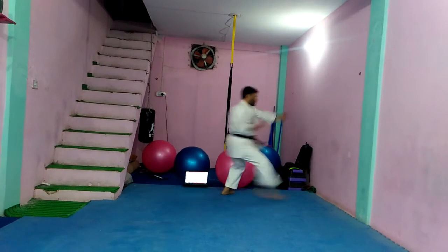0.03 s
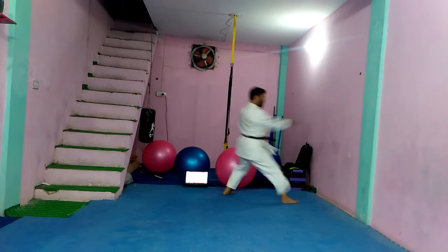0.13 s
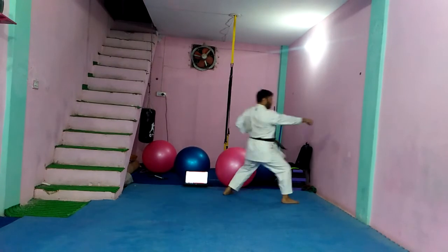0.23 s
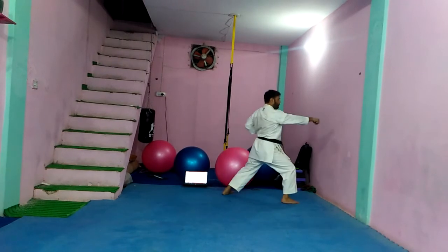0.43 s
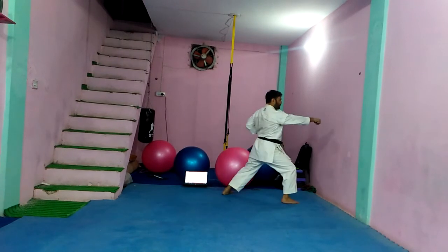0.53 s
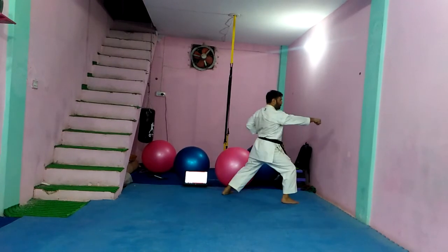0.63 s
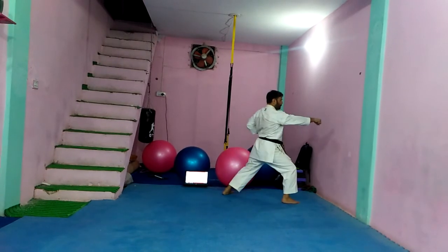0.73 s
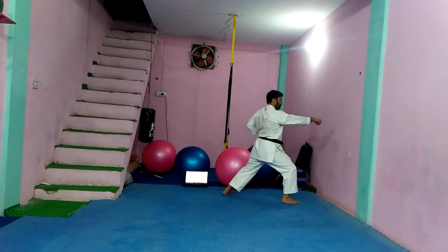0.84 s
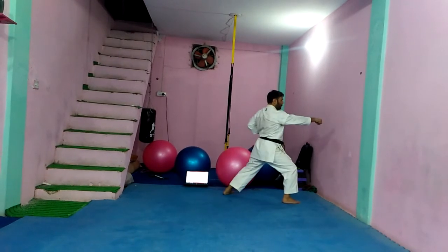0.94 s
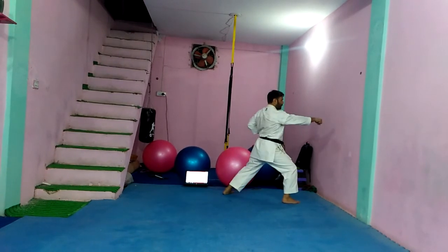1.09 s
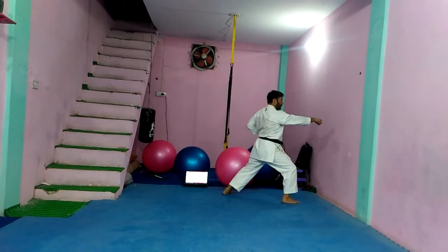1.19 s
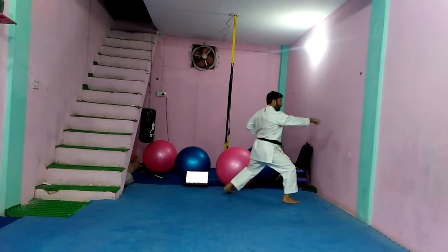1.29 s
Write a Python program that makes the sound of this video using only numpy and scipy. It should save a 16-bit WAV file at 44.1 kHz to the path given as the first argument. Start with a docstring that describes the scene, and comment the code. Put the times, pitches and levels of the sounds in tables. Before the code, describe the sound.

A single karate lunge makes a cloth snap and a foot thud. The cotton suit swishes softly from the start, with light scuffs on a foam mat. At about 0.3 seconds the fabric snaps taut as the bare foot lands with a slap and a dull thud. The small room rings briefly, and a low boom fades over the next second into a faint hush.

```python
"""A cotton karate suit swishes, then snaps taut with the punch of a single lunge.
It is heard from inside a small, bare-walled practice room, centred on a stereo microphone.
A bare foot slides out and thuds onto the foam mat. The walls ring briefly, and the room's
low standing waves boom on for a second. A noise suppressor lowers the faint hush."""
import sys
import numpy as np
from scipy import signal
from scipy.fft import rfft, irfft, next_fast_len
from scipy.io import wavfile
from scipy.ndimage import uniform_filter1d

SR = 44100
rng = np.random.default_rng(int(sys.argv[2]) if len(sys.argv) > 2 else 0)


def persist_wave(psi):
    """Save psi, clipped to +-1, as 16-bit WAV."""
    counts = np.round(np.clip(psi, -1, 1) * 32767).astype(np.int16)
    wavfile.write(sys.argv[1], SR, np.atleast_2d(counts).T)


N = 59535
LEAD = 16384  # samples before time zero, so that the room is already sounding


def amp(db):
    """Decibels to gain."""
    return 10 ** (np.asarray(db) / 20)


def clock():
    """Time in seconds, lead-in included."""
    return np.arange(-LEAD, N) / SR


def curve_at(points, hz):
    """Reads a table along a log-frequency axis."""
    f, value = np.transpose(points)
    return np.interp(np.log(hz + 1), np.log(f + 1), value)


def coloured(x, spectrum, size=8192):
    """Causal filter of unit energy: the spectrum sets only the colour."""
    log_gain = np.log(amp(curve_at(spectrum, abs(np.fft.fftfreq(size, 1 / SR)))))
    minimum_phase = np.exp(np.conj(signal.hilbert(log_gain)))
    taps = np.fft.ifft(minimum_phase).real[:size // 2]
    return signal.fftconvolve(x, taps / np.linalg.norm(taps))[:len(x)]


# colour of the still room (frequency [Hz], level [dB])
HUSH_SPECTRUM = [(25, -5.5), (100, -0.5), (300, -22.5), (1000, -18), (4000, -31), (14000, -37.5)]

def room_tone(level_db=-67.5):
    """A faint, steady hush at the microphone, mostly bass."""
    return amp(level_db) * coloured(rng.standard_normal(LEAD + N), HUSH_SPECTRUM)


# reverberation of the practice room (frequency [Hz], t60 [s])
WALL_DECAY = [(70, 1.4), (180, 2.1), (250, 1.0), (320, 1.4), (390, 1), (520, 1.2), (605, 1.124),
              (690, 0.85), (1000, 0.77), (2000, 0.91), (3200, 0.67), (6000, .63), (9000, 0.53),
              (14000, 0.37)]
# hollow rings between the bare walls (frequency [Hz], width [Hz], boost [dB])
HOLLOW_RINGS = [(587.5, 21, 6), (742, 31, 3), (1036, 45, 2.5), (1315, 46, 1.5)]

def walls(x, delay_s=.004, size=2048):
    """Dense reflections off nearby walls: each band dies at its own speed, and a few pitches ring."""
    hz, t, reflections = signal.stft(rng.choice([-1., 1.], N), SR, nperseg=size)
    rate = np.log(1000) / curve_at(WALL_DECAY, hz)[:, None]
    decay = np.exp(-rate * t) * np.sqrt(2 * rate / SR)
    ring_db = sum(db / (1 + (2 * (hz - f) / width) ** 2) for f, width, db in HOLLOW_RINGS)
    tail = signal.istft(reflections * amp(ring_db)[:, None] * decay, SR, nperseg=size)[1]
    return signal.fftconvolve(x, np.pad(tail, (round(delay_s * SR), 0)))[:len(x)]


# the room's low resonances (frequency [Hz], level [dB], t60 [s])
STANDING_WAVES = [(39.08, -63.98, 2.5), (59.26, -52.57, 2.0), (73.68, -49.3, 2.1), (79.83, -53.41, 1.95),
                  (83.56, -40.28, 2.34), (92.19, -45.73, 3.06), (98.13, -39.57, 1.04),
                  (110.24, -46.1, 1.58), (116.33, -33.8, 0.38), (119.57, -43.12, 2.44),
                  (133.12, -49.34, 1.48), (152.35, -51.41, 2.04), (185.88, -47.23, 1.6),
                  (198.84, -36.76, 0.5)]

def room_boom(force, rise_s=.008):
    """A push on the floor sets off standing waves, which build quickly and die slowly."""
    t = np.arange(N) / SR
    waves = sum(amp(db - 60 * t / t60) * np.sin(2 * np.pi * hz * t) for hz, db, t60 in STANDING_WAVES)
    onset = 1 - np.exp(-t / rise_s)
    return signal.fftconvolve(force, waves * onset)[:len(force)]


# three light scuffs, touch-down, full weight (time [s], level [dB], contact time [s])
FOOT_CONTACTS = [(.128, -14.5, 0.0018), (0.164, -13, 0.0074), (0.216, -10, .008), (0.252, 3, 0.002),
                 (0.304, 7, .0025)]
# dull colour of the foam (frequency [Hz], level [dB])
FOAM_SPECTRUM = [(25, -30), (50, -17), (75, -8), (115, -6), (145, -7), (200, -8), (235, -9), (315, 3),
                 (372, -21), (450, -11), (900, -30)]

def foot_on_mat(thump_db=-13, reverb_db=4.5):
    """Down at the floor the foot pushes into the foam, which thumps and makes the room boom."""
    t = clock()
    force = np.zeros(LEAD + N)
    for start, db, contact in FOOT_CONTACTS:
        age = np.maximum(t - start, 0) / (contact / 4)
        push = age * np.exp(-age)
        force += amp(db) * push / push.sum()
    thump = amp(thump_db) * coloured(force, FOAM_SPECTRUM)
    return room_boom(force) + thump + amp(reverb_db) * walls(thump)


# sharp slaps of cloth and sole (time [s], relative level [dB])
SLAP_HITS = [(0.2861, -5.5), (0.315, -4.5), (.3212, -4), (.333, -4.5)]
# their colour (frequency [Hz], level [dB])
SLAP_SPECTRUM = [(100, -13), (380, -12.5), (650, 1.5), (1400, -3), (2200, -4.5), (3200, -16), (8000, -23),
                 (14000, -33.5)]

def slaps(level_db=-5, reverb_db=5):
    """Single cracks of cloth and sole, far enough off that the walls outweigh the direct sound."""
    clicks = np.zeros(LEAD + N)
    for start, db in SLAP_HITS:
        clicks[LEAD + round(start * SR)] += amp(level_db + db)
    direct = coloured(clicks, SLAP_SPECTRUM)
    return direct + amp(reverb_db) * walls(direct)


def cloth(envelope, spectrum, slips_per_s=9000, spread_db=3, direct_db=-1.5, path_change_s=.018):
    """Thousands of tiny slips of fabric reach the microphone directly and off the walls."""
    n = len(envelope)
    slips = rng.choice([-1., 1.], n) * (rng.random(n) < slips_per_s / SR)
    slips *= amp(spread_db * np.minimum(rng.exponential(1, n), 4))
    slips /= np.sqrt(np.mean(slips ** 2))
    direct = coloured(slips * envelope, spectrum)
    turn = np.pi / 2 * clock() / path_change_s  # the moving body finds new paths to the walls
    return amp(direct_db) * direct + walls(direct * np.cos(turn)) + walls(direct * np.sin(turn))


# cloth swinging through the air (time [s], level [dB])
SWISH_LEVELS = [(0, -43), (.04, -46), (.08, -46.5), (.11, -41.5), (.16, -46), (.225, -44.5), (0.247, -34)]
# its colour (frequency [Hz], level [dB])
SWISH_SPECTRUM = [(40, -22.5), (150, -5), (240, -17.5), (320, -9.5), (375, -11.5), (520, -7), (780, -0.5),
                  (1200, -4.5), (1900, -9), (3100, -21), (7000, -26), (14000, -29.5)]

def swish(fade_s=.02):
    """Sleeves and trouser legs brush along during the step."""
    t = clock()
    times, db = np.transpose(SWISH_LEVELS)
    fade = np.exp(-np.maximum(t - times[-1], 0) / fade_s)
    return cloth(amp(np.interp(t, times, db)) * fade, SWISH_SPECTRUM)


def snap(spectrum, start_s, rise_s, hold_s, fall_s, db):
    """The fabric whips taut: a quick swell, a brief hold and a short fall."""
    t = clock() - start_s
    envelope = np.clip(t / rise_s, 0, 1) * np.exp(-np.maximum(t - rise_s - hold_s, 0) / fall_s)
    return cloth(amp(db) * envelope, spectrum)


# midrange flap of the heavy folds (frequency [Hz], level [dB])
FOLD_SPECTRUM = [(150, -22.5), (310, -8), (375, -28), (430, -3.5), (510, -16.5), (610, -1), (670, -7.5),
                 (745, 1), (820, -10), (950, -2), (1350, -3.5), (1900, -7), (2500, -12.5), (3100, -18),
                 (8000, -44.5)]
# bright rasp of the weave (frequency [Hz], level [dB])
WEAVE_SPECTRUM = [(800, -16.5), (2200, -4.5), (3200, -2.5), (5000, 1), (6000, -4), (7000, -1), (10000, -5),
                  (14000, -9.5)]

def suit():
    """The cotton suit swishes; with the punch its folds flap and its weave rasps."""
    flap = snap(FOLD_SPECTRUM, start_s=.243, rise_s=.028, hold_s=.019, fall_s=.032, db=-24.5)
    rasp = snap(WEAVE_SPECTRUM, start_s=.251, rise_s=.0039, hold_s=.039, fall_s=.026, db=-33)
    return swish() + flap + rasp


# stereo width of the suit at the microphone (frequency [Hz], side gain [dB])
SUIT_WIDTH = [(2800, -78.5), (4400, -33.5), (5800, -8), (8000, -4.5), (14000, -7)]

def scene():
    """The lunge is straight ahead of the microphone; only the treble of the cloth spreads wide."""
    mid = room_tone() + suit() + slaps() + foot_on_mat()
    size = next_fast_len(2 * len(mid))
    side_gain = amp(curve_at(SUIT_WIDTH, np.fft.rfftfreq(size, 1 / SR)))
    side = irfft(rfft(suit(), size) * side_gain, size)[:len(mid)]  # fresh slips, unrelated to the mid
    return np.array([mid + side, mid - side])[:, LEAD:]


# threshold below which the noise suppressor closes (frequency [Hz], level [dB])
GATE_THRESHOLD = [(100, -96), (400, -71.5), (1000, -73.5), (2500, -73.5), (4000, -85.5), (8000, -92),
                  (14000, -109)]

def record(dry, depth_db=8.5, steepness=2.2, cutoff_hz=14350, size=512):
    """After the microphone, a noise suppressor lowers faint bands and a low-pass trims the top."""
    hz, _, bands = signal.stft(dry, SR, nperseg=size)
    power = (abs(bands) ** 2).mean(0)
    power = uniform_filter1d(power, size=9, axis=0)  # smooth across frequency
    power = abs(uniform_filter1d(power, size=5, axis=1))  # and over time
    threshold = amp(curve_at(GATE_THRESHOLD, hz))[:, None] ** 2
    closed = 1 / (1 + (power / threshold) ** steepness)
    gated = signal.istft(bands * amp(-depth_db * closed), nperseg=size)[1][:, :N]
    low_pass = signal.firwin(1023, cutoff_hz, window=("kaiser", 9), fs=SR)
    return signal.oaconvolve(gated, low_pass[None], "same")


dry = scene()
out = record(dry)
persist_wave(out)
```